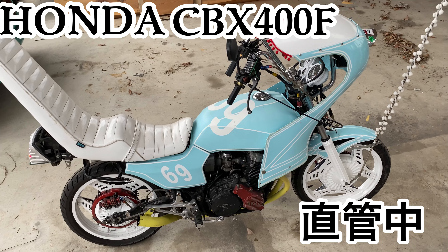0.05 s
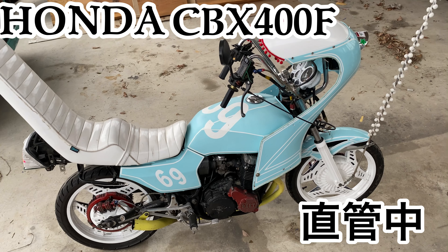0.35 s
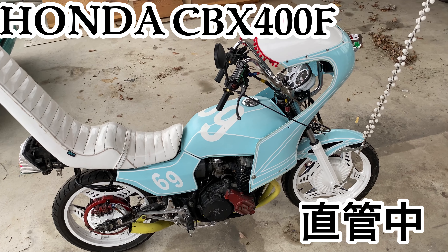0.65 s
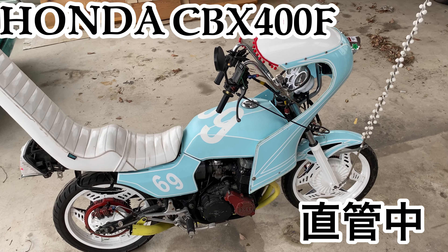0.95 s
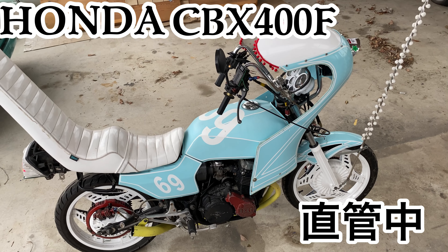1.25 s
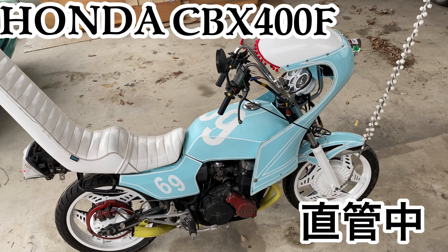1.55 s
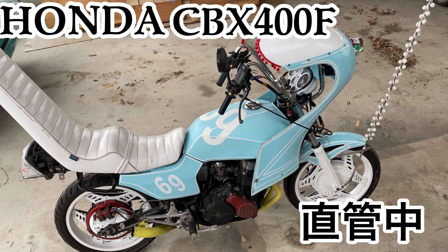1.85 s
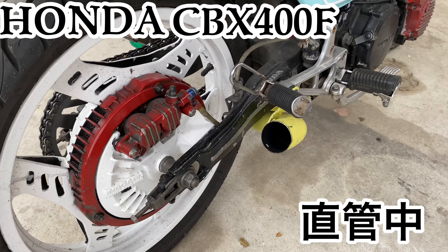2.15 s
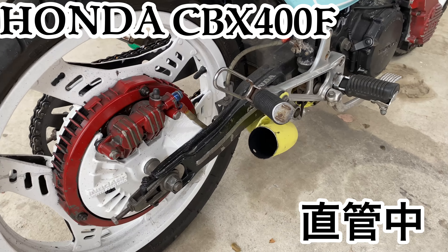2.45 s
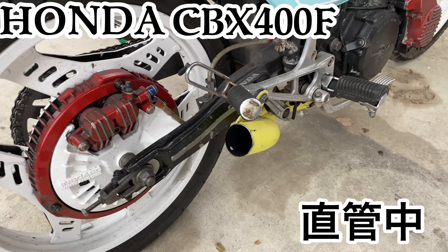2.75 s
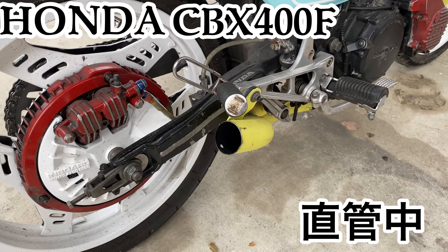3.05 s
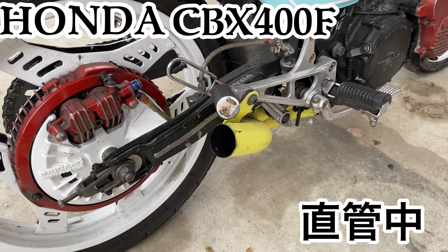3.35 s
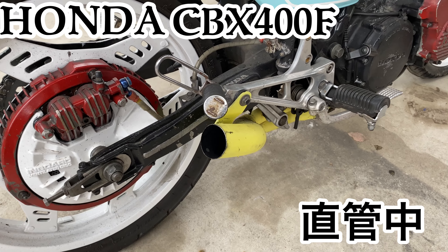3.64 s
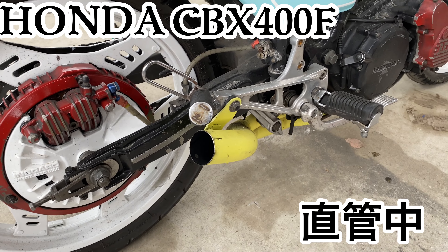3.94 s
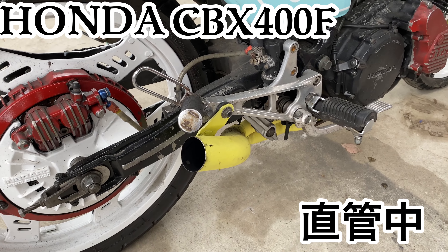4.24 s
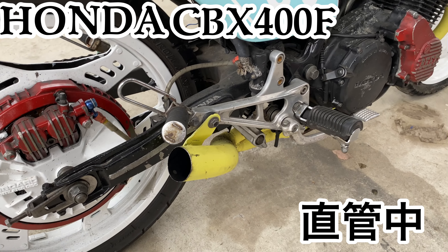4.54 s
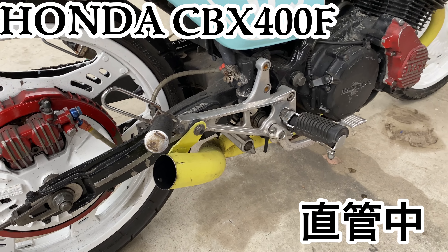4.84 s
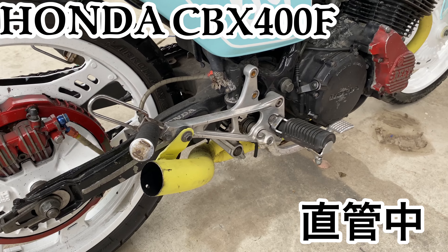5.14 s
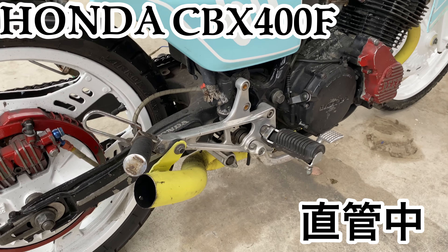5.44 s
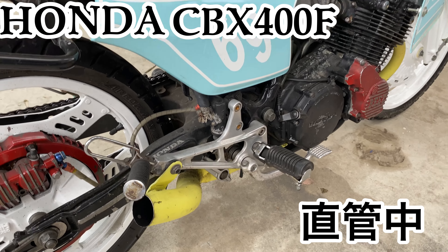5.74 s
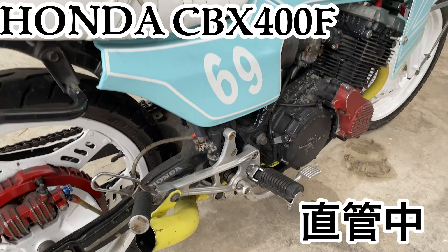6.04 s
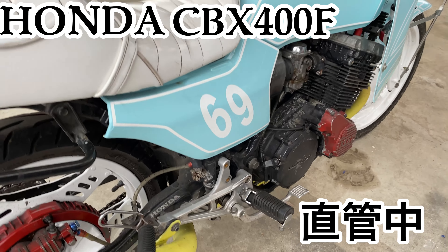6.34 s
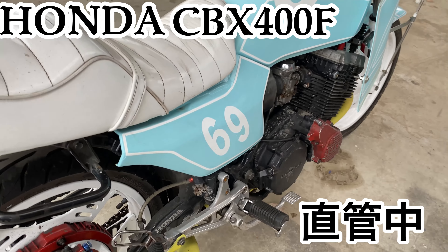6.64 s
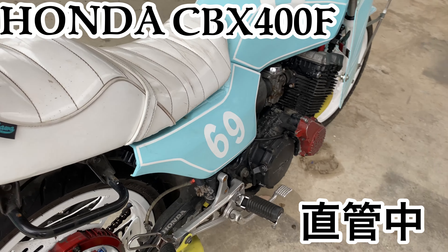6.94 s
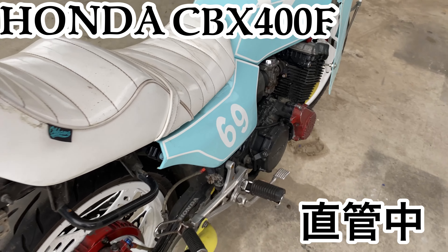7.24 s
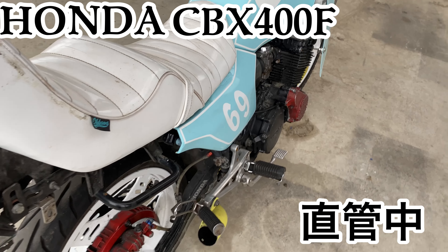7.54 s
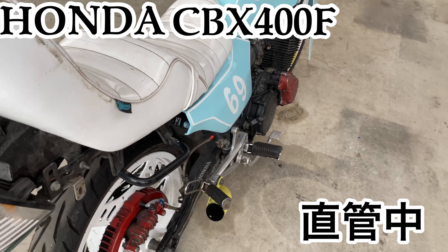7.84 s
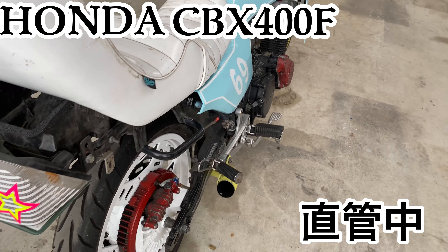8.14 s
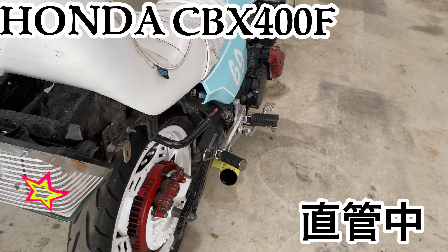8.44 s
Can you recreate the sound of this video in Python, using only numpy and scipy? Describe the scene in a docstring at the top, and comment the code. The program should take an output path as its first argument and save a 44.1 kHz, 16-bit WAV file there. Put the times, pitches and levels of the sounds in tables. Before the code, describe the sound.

A four-cylinder motorcycle idles through an open exhaust in a garage with loping, uneven pops, first a few steps away, then suddenly close.

```python
"""A four-cylinder motorcycle idles through a straight pipe in a garage.
At first it is a few steps away, loping in runs of seven pops, each run ended by a misfire.
Each pop is a sharp crack of gas plus a boom that rings the pipe and the room; valves rustle beneath.
After two seconds it is abruptly heard from close beside the pipe's mouth. Near three seconds it
stumbles once, then lopes on to the end, its tone shifting as the listener walks around the pipe."""
import sys
import numpy as np
from scipy import signal
from scipy.fft import rfft, irfft, next_fast_len
from scipy.io import wavfile
from scipy.ndimage import uniform_filter1d

SR = 44100
rng = np.random.default_rng(int(sys.argv[2]) if len(sys.argv) > 2 else 0)


def pcm_store(signal):
    """Save signal as 16-bit PCM."""
    levels = np.round(np.clip(np.atleast_2d(signal), -1, 1) * 32767)
    wavfile.write(sys.argv[1], SR, levels.astype(np.int16).T)


N = 383229
CLOSE_FROM_S = 2.027

# One row per run of pops. Drag is how late the third pop comes; swell is the rise from first to last.
# start_s, end_s, drag_s, boom_db, crack_db, swell_db
POP_RUNS = [(-0.12, 0.0797, -0.0062, -17, -39, -3), (0.1538, 0.353, 0.0067, -18.5, -42, 0.0),
            (0.416, 0.616, 0.0028, -18, -42, -0.5), (0.6819, 0.905, -0.0041, -18.5, -41.5, 5),
            (0.98, 1.19, 0.0037, -17, -41.5, 3), (1.259, 1.4655, 0.0035, -15.5, -40, 3),
            (1.534, 1.7385, 0.0037, -14.5, -38.5, 0), (1.8047, 2.022, -0.0006, -13.5, -39.5, 6),
            (1.898, 2.105, 0.0, -7.5, -19.5, 0.0), (2.1787, 2.413, -0.0037, -10, -22.5, -9.5),
            (2.518, 2.7639, 0.016, -9, -22, 9), (2.8396, 3.109, -0.0084, -8.5, -26.5, -9),
            (3.2127, 3.4625, 0.015, -9, -25, 8.5), (3.5432, 3.7593, 0.0068, -6.5, -20, 2.5),
            (3.831, 4.0546, -0.000039, -6.0, -19.5, -3.5), (4.1346, 4.3608, 0.0039, -6.5, -21.5, 1),
            (4.4338, 4.688, 0.0029, -8.5, -23.5, -1.5), (4.7937, 5.0526, 0.0198, -8.5, -25.5, 9.5),
            (5.1346, 5.3674, -0.00056, -6.5, -23.5, 0.5), (5.4539, 5.6848, 0.0044, -7, -24.5, 2.5),
            (5.7644, 5.9941, 0.0034, -7, -24, -1.0), (6.074, 6.2927, 0.0047, -7.5, -25.5, -1),
            (6.364, 6.585, 0.0017, -8.5, -25.5, -5), (6.6637, 6.8848, 0.0038, -9.5, -25.0, -0.5),
            (6.9603, 7.1814, 0.0028, -9.5, -26.5, -3.0), (7.2573, 7.472, 0.0042, -10, -24.5, 2),
            (7.547, 7.7814, -0.0025, -10.5, -23, -4.5), (7.8716, 8.1014, 0.012, -11, -24, 4),
            (8.178, 8.4074, -0.003, -10, -25, -4.5), (8.4902, 8.723, 0.0016, -12.5, -25, -1.5)]
# The seven beats of a run, weak just after the misfire: boom_db, crack_db
SEVEN_BEATS = [(-1.5, -5.5), (-1, -2.5), (0.5, 1.3), (0.6, 2.5), (0.9, 1.5), (0.5, 2), (0.4, 2)]
# Pops that catch harder than their neighbours: time_s, accent_db
HARD_POPS = [(.485, 5.5), (.753, 8), (1.054, 7), (1.605, 4), (1.878, 10), (2.253, 4.5), (2.417, 6),
             (2.879, 7.5), (3.062, 12), (3.352, 4), (3.388, 4.5), (3.622, 2.5), (4.689, 7.5), (5.212, 7.5),
             (7.624, 4.5), (8.293, 4), (8.369, 5.5), (8.532, 3)]
def firings(scatter_db=1, jitter_s=.0001, settle=1.7, stumble_s=2.92):
    """The engine fires in uneven runs that settle to a beat. Gives rows of start_s, boom_db, crack_db."""
    along = np.linspace(0, 1, len(SEVEN_BEATS))
    late = along * (1 - along) ** settle
    beat_boom, beat_crack = np.transpose(SEVEN_BEATS)
    pops = []
    for start, end, drag, boom_db, crack_db, swell_db in POP_RUNS:
        wobble, luck = rng.standard_normal((2, len(SEVEN_BEATS)))
        s = start + (end - start) * along + drag * late / late.max() + jitter_s * wobble
        swell = swell_db * (along - .5)
        accent = scatter_db * luck + sum(db * (abs(s - at) < .015) for at, db in HARD_POPS)
        boom = boom_db + beat_boom + 0.52 * swell + 0.18 * accent
        crack = crack_db + beat_crack + swell + accent
        # a run is heard either far or close, depending on when it ends
        heard = (s > 0) & ((s < CLOSE_FROM_S) == (end < CLOSE_FROM_S))
        fires = abs(s - stumble_s) > .015  # one extra misfire
        pops.append(np.transpose([s, boom, crack])[heard & fires])
    return np.concatenate(pops)


# The notes that pipe and garage ring with. Fade is the time to drop by 60 dB.
# pitch_hz, level_db, fade_s, change_when_far_db
PIPE_NOTES = [(53.2, 1, 0.2, -3.5), (65.7, 4, 0.14, -6), (96.3, -7, 0.36, -2.5), (106.3, -9.5, 0.17, -5),
              (147, -6, 0.11, -9), (175.8, -5.5, 0.14, -8), (195.56, -5, 0.35, -1),
              (228.3, -5.5, 0.069, -4.5), (300, -1, 0.058, -4.5), (324.9, -7, 0.24, -7.5),
              (373, -25.5, 0.24, -17), (453.2, -13.5, 0.13, -10.5), (489.3, -17.5, 0.088, -8),
              (521, -31.5, 0.15, -17), (577, -19, 0.056, -12), (588.8, -25.5, 0.24, -3),
              (647, -29, 0.11, -4), (732.3, -23.5, 0.12, -6)]
def pipe_ring(far, low_cut_hz=43):
    """One push of air rings all the pipe's notes at once."""
    t = np.arange(SR) / SR
    ring = sum((-1) ** k * amp(db + far * far_db - 60 * t / fade_s) * np.sin(2 * np.pi * hz * t)
               for k, (hz, db, fade_s, far_db) in enumerate(PIPE_NOTES))
    low_cut = signal.butter(4, low_cut_hz, "high", fs=SR, output="sos")
    gain = abs(np.fft.fft(signal.sosfilt(low_cut, ring)))
    # keep the tone but pack the energy towards the start (minimum phase)
    log_gain = np.log(np.maximum(gain, gain.max() * 1e-4))
    return np.fft.ifft(np.exp(np.conj(signal.hilbert(log_gain)))).real[:SR // 2]


def booms(pops, lag_s=0.00047, churn_db=-41, churn_s=0.023, gulp_db=-6.5, gulp_s=0.0032, bass_hz=125):
    """Each pop shoves gas down the pipe, with a churning wake that makes no two booms alike."""
    t = np.arange(SR // 25) / SR
    pushes = amp(churn_db) * rng.standard_normal((len(pops), len(t))) * np.exp(-t / churn_s)
    pushes[:, 0] += 1
    is_far = (pops[:, 0] < CLOSE_FROM_S).astype(int)
    usual_db = [pops[is_far == far, 1].mean() for far in range(2)]
    bass, front = np.zeros((2, 2, N))
    for (s, db, _), push, far in zip(pops, pushes, is_far):
        # a hard pop sharpens on its way: its front gains more than its bass
        force_db = db - usual_db[far]
        add(bass[far], s + lag_s, amp(db - 0.35 * force_db) * push)
        add(front[far], s + lag_s, amp(db + 0.21 * force_db) * push)
    drive = front + shaped(bass - front, lambda hz: 1 / (1 + (hz / bass_hz) ** 4))
    # in each long gap a cylinder fails to fire; its open valve gulps gas back from the pipe
    gulp = np.sin(np.pi * np.minimum(t / gulp_s, 1)) ** 2
    for (s, db, _), next_s, far in zip(pops, pops[1:, 0], is_far):
        if next_s - s > .062:
            add(drive[far], s + .49 * (next_s - s), -amp(db + gulp_db) * gulp / gulp.sum())
    boom = sum(signal.oaconvolve(drive[far], pipe_ring(far))[:N] for far in range(2))
    # the pipe's upper notes come and go along the walk
    upper_notes = shaped(boom, lambda hz: hz ** 8 / (hz ** 8 + 400. ** 8))
    upper_notes_db = walk(np.arange(N) / SR)[0]
    return boom + upper_notes * (amp(upper_notes_db) - 1)


# The tone of the crack, from low to high: pitch_hz, level_db
CRACK_TONE = [(150, -22), (600, 11.5), (900, -7), (1600, -0.5), (2500, 2), (4000, 3), (5700, 0),
              (7200, 5.5), (8800, 1), (11500, 1.5), (14000, -3), (15700, -5), (16600, -37)]
def cracks(pops, level_db=4, rise_s=0.0016, fall_s=0.0026, grit_db=3, hard_above_db=-21, brighten=0.43):
    """Gas tears out of the pipe's mouth: gritty noise that swells and dies within milliseconds."""
    t = np.arange(-256, 1024) / SR
    burst = np.where(t < 0, np.exp(-(t / rise_s) ** 2), np.exp(-abs(t) / fall_s))
    noise, grit, swirls = rng.standard_normal((len(pops), 3, len(t))).transpose(1, 0, 2)
    grit = evened(uniform_filter1d(grit, size=14, axis=1))
    # each jet sheds swirls of its own sizes, so each crack has its own tone
    swirls = uniform_filter1d(swirls, size=26, axis=1)
    swirls = evened(uniform_filter1d(swirls, size=12, axis=1))
    tone_db = 2.2 * swirls[:, :len(t) // 2 + 1]
    jets = irfft(rfft(noise * amp(grit_db * grit)) * amp(tone_db))
    below_treble = 1 / (1 + (np.fft.rfftfreq(len(t), 1 / SR) / 4500) ** 4)
    out = np.zeros(N)
    for (s, _, db), jet in zip(pops, jets):
        # the hardest jets put their extra force into the treble
        jet = irfft(rfft(jet) * amp(-brighten * max(db - hard_above_db, 0) * below_treble))
        add(out, s + t[0], amp(db) * evened(burst * jet) * np.sqrt(np.mean(burst ** 2)))
    return amp(level_db) * shaped(out, lambda hz: amp(read(CRACK_TONE, hz)))


def puffs(pops, level_db=-21, fall_s=0.018, pitch_hz=900, far_db=-8):
    """Slower gas follows each crack with a dull chuff."""
    t = np.arange(SR // 10) / SR
    flow = np.zeros(N)
    for s, db, _ in pops:
        add(flow, s, amp(db) * np.exp(-t / fall_s))
    noise = flow * rng.standard_normal(N) * when_far(far_db)
    return amp(level_db) * shaped(noise, lambda hz: 2 * (hz / pitch_hz) / (1 + (hz / pitch_hz) ** 2))


# Where the pipe wall and engine case ring: pitch_hz, width_hz, boost_db
METAL_NOTES = [(975, 130, 8.5), (1165, 80, 8.5), (1557, 220, 5.5), (2305, 130, 3.5), (2730, 75, 4),
               (3300, 420, 2), (4780, 910, 6), (6800, 290, 1.5)]
def metal_db(hz):
    """Metal parts boost any sound near their own notes."""
    return sum(db / (1 + (2 * (hz - pitch) / width) ** 2) for pitch, width, db in METAL_NOTES)


# The tone of the valves and their chain: pitch_hz, level_db
RUSTLE_TONE = [(20, -20), (120, 16.5), (500, 20), (850, 6.5), (1150, 0.5), (1500, 1), (2500, 2.5),
               (4000, -6.5), (7000, -3.5), (9000, -12.5), (12000, -16), (16000, -22)]
def valve_gear(pops, level_db=-44, far_db=-1, tap_db=-50, tap_s=0.0013, spread_db=6.0):
    """The chain rustles steadily, and the valves tap four times between one pop and the next."""
    quarter_beats = np.arange(0, len(pops) - 1, 1 / 4) + 1 / 8
    tap_times = np.interp(quarter_beats, np.arange(len(pops)), pops[:, 0])
    t, taps = np.arange(SR // 100) / SR, np.zeros(N)
    for s, size in zip(tap_times, rng.standard_normal(len(tap_times))):
        add(taps, s, amp(spread_db * size) * np.exp(-t / tap_s))
    force = np.hypot(amp(level_db), amp(tap_db) * evened(taps))
    noise = force * rng.standard_normal((2, N))
    rustle = shaped(noise, lambda hz: amp(read(RUSTLE_TONE, hz) + metal_db(hz)))
    nearness = amp(walk(np.arange(N) / SR)[2]) * when_far(far_db)
    return evened(rustle) * np.sqrt(np.mean(force ** 2)) * nearness


# Stray ticks near the start: start_s, level_db
METAL_TICKS = [(0.1035, -29), (0.7238, -30), (0.9485, -30), (1.3454, -30)]
def ticks(boost_db=9, fall_s=0.00083, dull_hz=3000):
    """Metal gives a few dry ticks, each a tiny burst of noise."""
    t, out = np.arange(SR // 100) / SR, np.zeros(N)
    for s, db in METAL_TICKS:
        add(out, s, amp(db) * np.exp(-t / fall_s) * rng.standard_normal(len(t)))
    return amp(boost_db) * shaped(out, lambda hz: 1 / np.hypot(1, hz / dull_hz))


# Spots along the listener's walk: time_s, upper_notes_db, treble_db, engine_nearness_db, right_lag_ms
LISTENER_WALK = [(0, 2, 0, 0.5, -0.053), (2, -1, -2, 3, -0.00016), (2.05, -0.5, 0.5, -3, -0.12),
                 (3, -2.5, -1.5, -3, -0.11), (3.998, -0.5, -2.5, 7, -0.038), (5, -2, -2.5, 0.5, 0.04),
                 (5.599, 0.5, 1.5, 8.5, 0.011), (6.5, 1, -0.5, 9.5, 0.0018), (7.2, 0.5, -2, 10.5, -0.054),
                 (7.7, -0.5, -3.5, 8.5, -0.023), (8.2, -0.5, -3.5, 3.5, -0.11), (8.7, 0.5, 1, 8, -0.044)]
def walk(t):
    """The listener moves smoothly around the pipe. Gives the last four columns at times t."""
    s, *columns = np.transpose(LISTENER_WALK)
    return [np.interp(t, s, column) for column in columns]


# How far the wave on the left runs ahead of the right: pitch_hz, lead_radians
LEFT_LEAD = [(20, -0.5), (300, 0.47), (800, 0.45), (1700, 0.44), (2500, 2), (4000, 2), (5600, 5.5),
             (7000, 5.5), (8300, 4.5), (9200, 4), (11000, -0.5), (13200, -2.5), (15000, -6)]
def direct_sound(x, beam_hz=4500):
    """Sound reaches left and right out of step, brighter where the pipe points at the listener."""
    hz, t, spectrum = signal.stft(x, SR, nperseg=512)
    _, treble_db, _, lag_ms = walk(t)
    treble = (hz ** 6 / (hz ** 6 + beam_hz ** 6))[:, None]
    phase = read(LEFT_LEAD, hz)[:, None] + 2 * np.pi * np.outer(hz, lag_ms / 1000) * (1 - treble)
    left = spectrum * amp(treble_db * treble)
    right = left * np.exp(-1j * phase)
    return signal.istft(np.array([left, right]), SR, nperseg=512)[1][:, :N]


# Room notes that take a moment to build up: pitch_hz, width_hz
SLOW_ROOM_NOTES = [(197, 118), (290, 255), (460, 70), (620, 81)]
def room_build_up(x):
    """Sound near a room note arrives late, rounding each boom and ringing into the gaps."""
    def delay(hz):
        detuning = [(pitch ** 2 - hz ** 2) + 1j * hz * width for pitch, width in SLOW_ROOM_NOTES]
        return np.prod([np.conj(d) / d for d in detuning], axis=0)
    return shaped(x, delay)


# How strong the boom, bark and honk are along the walk: time_s, boom_db, bark_db, honk_db
LOUD_AND_QUIET_SPOTS = [(0, 1, 1, -1), (.7, 0, 4.5, -4), (1.4, 1.5, 0.5, -2), (2, -5, 1, -5),
                        (2.059, 0, 5, 6), (2.8, 0.5, 2, -1), (3.2, 1, -1, 1), (3.75, 0, 2, 0.5),
                        (4.4, 0, 1, 2), (5.2, -0.5, -0.5, 0.5), (6.3, 0, -0.5, -4), (6.9, 0.5, 0, -1),
                        (7.6, 0.5, 0, 2), (8.1, 1, -1.5, 4.5), (8.4, -5, 3.5, -1.5), (8.7, 1, 5.5, 3)]
def swell_and_fade(x, boom_hz=195, bark_hz=320, honk_hz=980, width_hz=70, honk_width_hz=220):
    """The low boom, the bark and the metal's honk swell and fade as the listener walks."""
    s, *levels = np.transpose(LOUD_AND_QUIET_SPOTS)
    bands = [(boom_hz, width_hz), (bark_hz, width_hz), (honk_hz, honk_width_hz)]
    out = x.copy()
    for (pitch, width), db in zip(bands, levels):
        band = shaped(x, lambda hz: np.exp(-((hz - pitch) / width) ** 2))
        out += band * (amp(np.interp(np.arange(N) / SR, s, db)) - 1)
    return out


# Quick echoes off floor, wheel and frame: delay_s, level_db
NEARBY_ECHOES = [(.0042, -2.5), (.0081, -6.5), (0.0123, -9), (0.0193, -9), (.024, -22)]
def early_echoes(x, dull_hz=4000, drift=.15):
    """Nearby surfaces return a duller copy to each side; the paths change as the listener moves."""
    t = np.arange(N) / SR
    out = np.zeros((2, N))
    for s, db in NEARBY_ECHOES:
        for side in range(2):
            delay_s = s * (1 + drift * np.sin(2 * np.pi * (t / t[-1] + rng.random())))
            out[side] += amp(db) * np.interp(t - delay_s, t, x, left=0)
    return shaped(out, lambda hz: 1 / (1 + (hz / dull_hz) ** 2))


# The tone that the walls throw back: pitch_hz, level_db
WALL_TONE = [(50, -50), (200, -13), (350, -1), (700, 0.5), (1200, -1), (2500, -2.5), (5000, -12.5),
             (8000, -14), (11000, -20.5), (16000, -14)]
# How long that sound takes to drop by 60 dB: pitch_hz, fade_s
WALL_FADE = [(100, 0.22), (1000, 0.82), (4000, 0.38), (8000, 0.29), (16000, 0.3)]
def garage(x, shared_below_hz=450, rise_s=0.014):
    """Echoes off concrete walls blur into a fading tail; the bass is the same on both sides."""
    hz, t, noise = signal.stft(rng.standard_normal((2, SR * 3 // 4)), SR, nperseg=256)
    same = (1 / (1 + (hz / shared_below_hz) ** 4))[:, None]
    noise[1] = same * noise[0] + np.sqrt(1 - same ** 2) * noise[1]
    fade = amp(-60 * t / read(WALL_FADE, hz)[:, None]) * (1 - np.exp(-t / rise_s))
    energy = (fade ** 2).sum(1, keepdims=True) * t[1] * SR
    fade *= amp(read(WALL_TONE, hz))[:, None] / np.sqrt(energy)
    tail = signal.istft(noise * fade, SR, nperseg=256)[1]
    return signal.oaconvolve(x[None], tail, axes=1)[:, :N]


def moving_garage(x, spots=4):
    """The echo tail blends from one spot of the walk into the next."""
    spot = np.linspace(0, spots - 1, N)
    return sum(garage(x * np.cos(np.pi / 2 * np.clip(spot - k, -1, 1))) for k in range(spots))


def amp(db):
    """Turns decibels into a number to multiply by."""
    return 10 ** (np.asarray(db) / 20)


def evened(x):
    """Scales a signal to an average strength (rms) of 1."""
    return x / np.sqrt(np.mean(x ** 2) + 1e-20)


def read(table, hz):
    """Looks up a pitch in a table, sliding between rows on a log scale."""
    pitch_hz, value = np.transpose(table)
    return np.interp(np.log(hz + 1), np.log(pitch_hz + 1), value)


def add(mix, start_s, sound):
    """Mixes a sound in at its start time."""
    part = mix[max(round(start_s * SR), 0):][:len(sound)]
    part += sound[:len(part)]


def shaped(x, response):
    """Filters a sound: each pitch is multiplied by response(hz)."""
    size = next_fast_len(N + 8192)
    return irfft(rfft(x, size) * response(np.fft.rfftfreq(size, 1 / SR)), size)[..., :N]


def when_far(db):
    """A level change that holds only while the listener stands back."""
    return amp(db * (np.arange(N) < CLOSE_FROM_S * SR))


def scene(room_db=-4, far_room_db=4, far_gas_db=-3):
    """Exhaust and engine in the garage; from afar there is more room and less crack."""
    pops = firings()
    gas_and_ticks = cracks(pops) + puffs(pops) + ticks()
    sharp = swell_and_fade(shaped(gas_and_ticks, lambda hz: amp(metal_db(hz))))
    boom = swell_and_fade(room_build_up(booms(pops)))
    direct = direct_sound(boom + sharp * when_far(far_gas_db))
    room = amp(room_db) * moving_garage((boom + sharp) * when_far(far_room_db))
    return direct + early_echoes(sharp) + room + valve_gear(pops)


# How much louder the left side is than the right: pitch_hz, difference_db
LEFT_OVER_RIGHT = [(60, 0), (110, -1.5), (200, 0), (380, 0.5), (700, 1.5), (1290, 1.5), (2380, -0.5),
                   (4400, 3), (8120, 3.5), (15000, -1.5)]
def record(dry):
    """The two sides differ a little in tone, the tallest peaks are rounded, and the top treble is cut."""
    x = shaped(dry, lambda hz: amp(np.outer([.5, -.5], read(LEFT_OVER_RIGHT, hz))))
    rounded = x / (1 + x ** 8) ** (1 / 8)
    treble_cut = signal.firwin(255, cutoff=16500, window=("kaiser", 9), fs=SR)
    return signal.oaconvolve(rounded, treble_cut[None], "same")


dry = scene()
out = record(dry)
pcm_store(out)
```